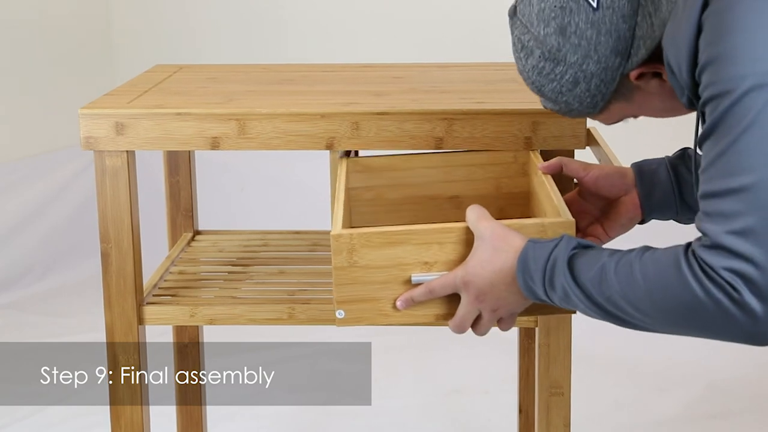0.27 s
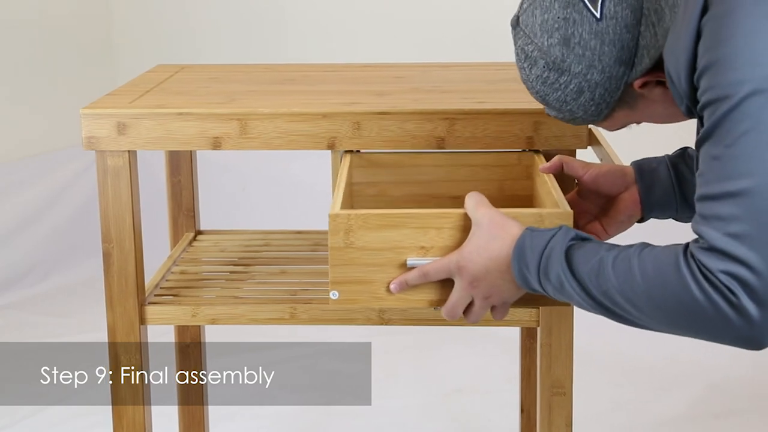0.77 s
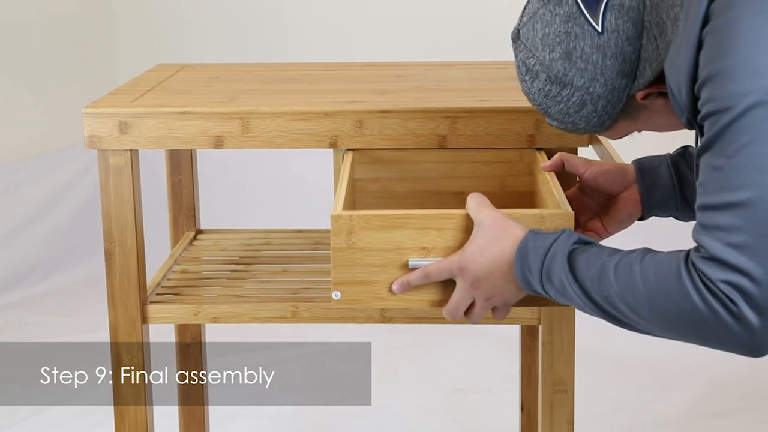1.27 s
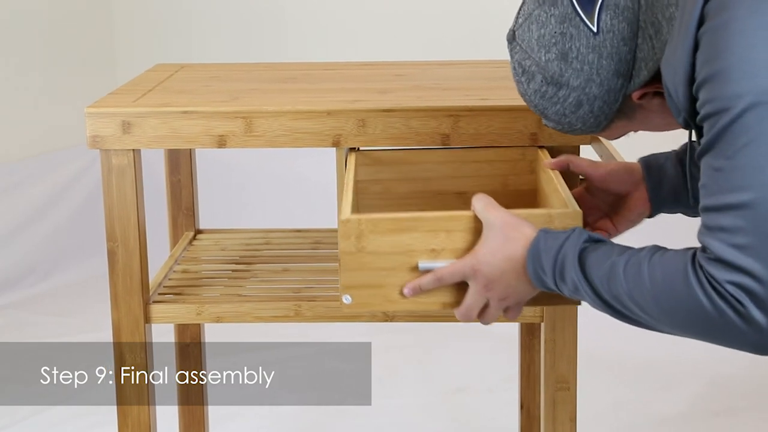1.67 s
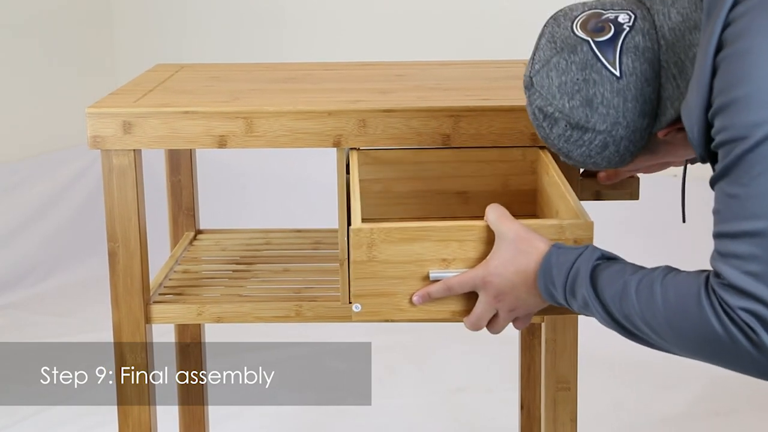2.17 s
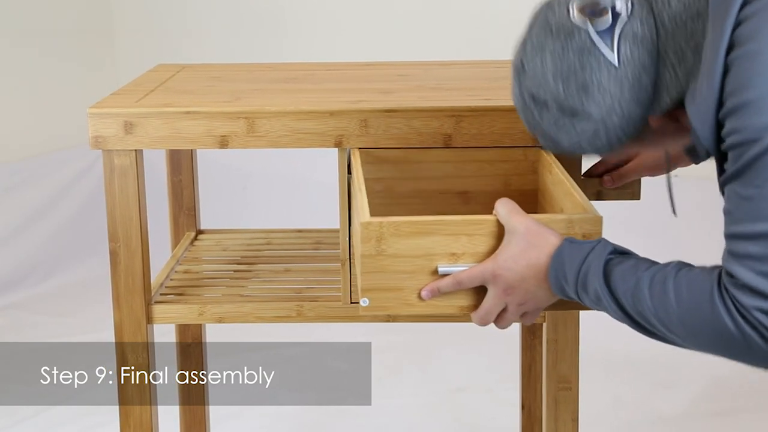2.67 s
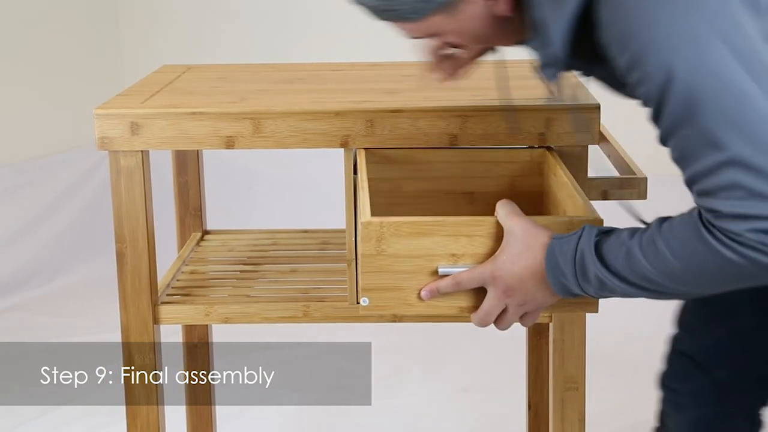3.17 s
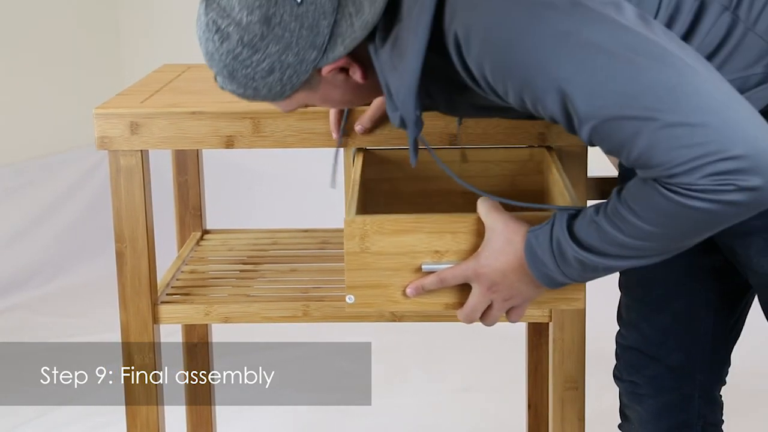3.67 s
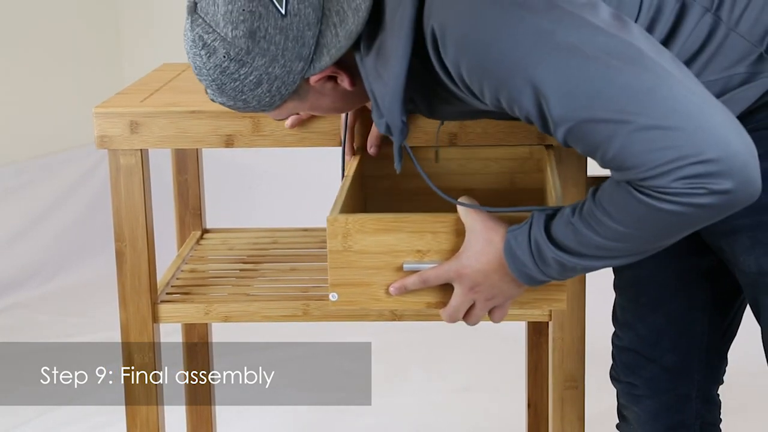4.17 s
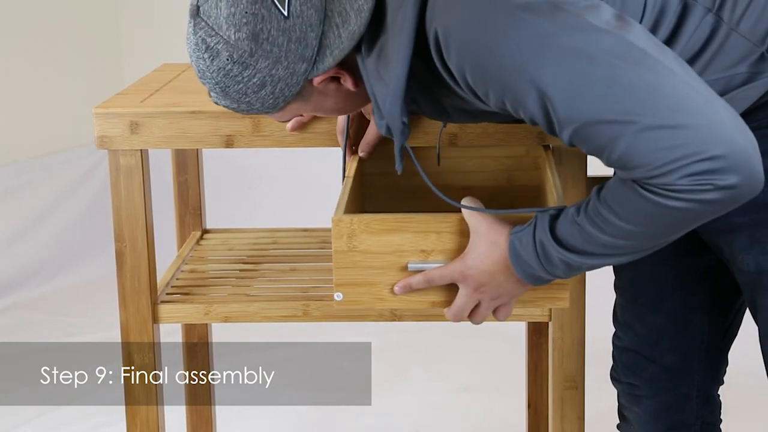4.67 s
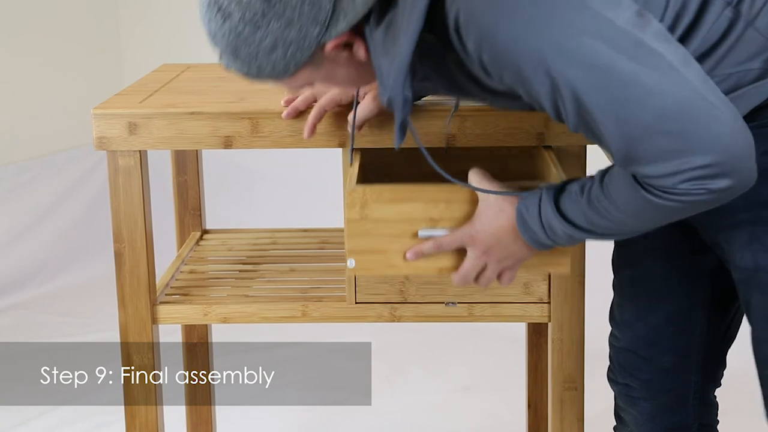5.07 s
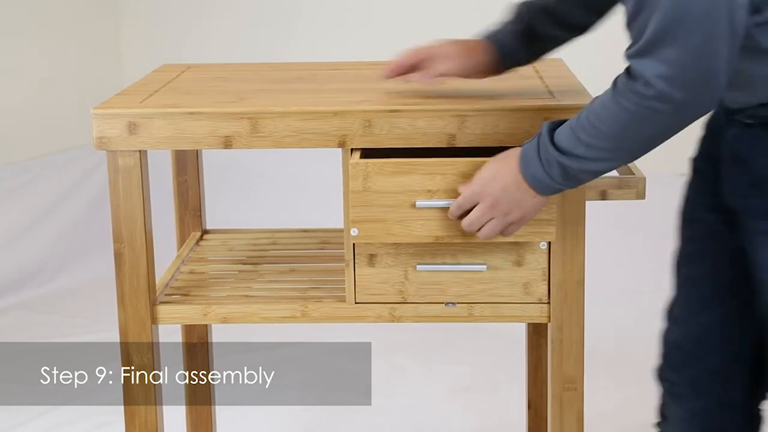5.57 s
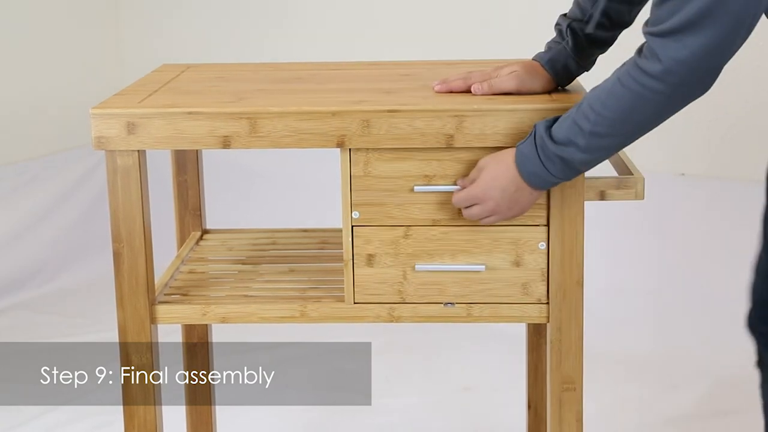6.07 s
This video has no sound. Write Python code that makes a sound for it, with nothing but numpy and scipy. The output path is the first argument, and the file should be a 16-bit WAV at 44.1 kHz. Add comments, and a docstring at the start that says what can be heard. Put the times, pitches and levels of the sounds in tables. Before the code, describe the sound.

In a quiet, bare, lightly echoing room, a hollow wooden drawer is jiggled in a cart, giving uneven knocks, brief scuffs and occasional thin clinks from metal runners. A sleeve brushes faintly midway. After a short lull it scrapes and groans inward in several pushes, then bangs against its stop, overloading the close microphone while the wooden frame hums briefly.

```python
"""A wooden drawer is jiggled into a kitchen cart in a quiet, bare room. From the start it knocks against its
opening (modal blows with scattered reflections); soon its metal runners clink (ticks exciting steel modes).
Between the knocks it scuffs and judders (random slips) and groans as it binds (stick-slip); midway a sleeve
brushes past (filtered noise). At last it slides home in a few pushes and bangs against the stop: the cart's
frame hums on (decaying modes) and the bang overloads the microphone (clipping)."""
import sys
import numpy as np
from scipy import signal
from scipy.fft import rfft, irfft
from scipy.io import wavfile

SR = 44100
rng = np.random.default_rng(int(sys.argv[2]) if len(sys.argv) > 2 else 0)


def wrap_up_sound(samples):
    """Save the sound to the file named by the first command line argument, as 16-bit audio."""
    columns = np.atleast_2d(samples).T
    # keep every value between -1 and 1, then stretch to whole-number steps
    tamed = np.clip(columns, -1, 1)
    steps = np.round(tamed * 32767).astype(np.int16)
    wavfile.write(sys.argv[1], SR, steps)


N = 279594
RING = 32768  # length of one impulse response in samples
AGE, TIME = np.arange(RING) / SR, np.arange(N) / SR  # seconds since a blow, seconds since the start


def amp(db):
    """Level: 20 dB is a factor of ten in amplitude."""
    return 10 ** (np.asarray(db) / 20)


def evened(x):
    """Normalization: scales a signal to rms 1."""
    return x / np.sqrt(np.mean(x ** 2) + 1e-20)


def read(points, hz):
    """Interpolation: reads a table of (Hz, value) on a log-frequency axis."""
    table_hz, value = np.transpose(points)
    return np.interp(np.log(hz + 1), np.log(table_hz + 1), value)


def add(mix, s, sound):
    """Superposition: mixes a sound in at time s, in place."""
    part = mix[round(s * SR):][:len(sound)]
    part += sound[:len(part)]


def coloured(x, points, size=4096):
    """Minimum-phase filtering: a causal response with the given (Hz, dB) shape."""
    log_gain = np.log(amp(read(points, abs(np.fft.fftfreq(size, 1 / SR)))))
    response = np.exp(np.conj(signal.hilbert(log_gain)))
    taps = np.fft.ifft(response).real
    return signal.fftconvolve(x, taps[:size // 2])[:len(x)]


def mode(hz, t60):
    """Damped free vibration: a sine that falls by 60 dB in t60 seconds."""
    return amp(-60 * AGE / t60) * np.sin(2 * np.pi * hz * AGE)


def wander(cutoff_hz):
    """Low-pass random process: smooth chance of rms 1."""
    lowpass = signal.butter(2, cutoff_hz, fs=SR, output="sos")
    return evened(signal.sosfilt(lowpass, rng.standard_normal(N)))


def stroke(s, length, db, build_db_per_s, ease_db_per_s, stop_db_per_s):
    """Exponential envelope of one movement: builds up to time s, eases while it lasts, then dies away."""
    age = TIME - s
    build_db = build_db_per_s * np.maximum(-age, 0)
    ease_db = ease_db_per_s * np.clip(age, 0, length)
    stop_db = stop_db_per_s * np.maximum(age - length, 0)
    return amp(db - np.minimum(build_db + ease_db + stop_db, 120))


# Reverberation of the room. Each row: frequency in Hz, t60 in seconds.
REVERBERATION = [(100, 0.55), (250, 0.62), (500, 0.44), (1000, 0.38), (2500, 0.35), (6000, 0.37),
                 (12000, 0.24)]
# Relative strength of the reflections: weakest near 330 Hz, stronger in the deep bass and toward the treble.
# Each row: frequency in Hz, strength in dB.
SCATTER_STRENGTH = [(150, 1.5), (330, -4.5), (700, -2), (1500, 0), (5000, 2.5)]


def room(wet_db, gap=0.0071, build=0.0028):
    """Diffuse-field reverberation: direct sound, then random reflections that die band by band."""
    reflections = rng.choice([-1., 1.], RING) * (rng.random(RING) < 4000 / SR)
    # a diffuse field favours no pitch: level out the peaks and holes of the dying reflections
    dying = amp(-60 * AGE / read(REVERBERATION, 300))
    spectrum = rfft(reflections * dying)
    power = np.convolve(abs(spectrum) ** 2, signal.windows.hann(46), "same")
    levelled = irfft(spectrum / np.sqrt(power)) / dying * (AGE < .5)
    # each frequency band gets its own strength and decay
    hz, t, bands = signal.stft(levelled, SR, nperseg=256)
    decay_db = 60 * t / read(REVERBERATION, hz)[:, None]
    fade = amp(read(SCATTER_STRENGTH, hz)[:, None] - decay_db)
    tail = signal.istft(bands * fade, SR, nperseg=256)[1][:RING]
    tail *= np.clip((AGE - gap) / build, 0, 1)
    direct = signal.unit_impulse(RING)
    return direct + amp(wet_db) * tail / np.linalg.norm(tail)


# Spectrum of the quiet room. Each row: frequency in Hz, relative density in dB per Hz.
HUSH_SPECTRUM = [(15, -44), (25, -48), (49, -5.5), (91, -18.5), (165, -1), (194, -12), (299, -8),
                 (527, -20), (587, -17), (881, -22), (981, -23.5), (2150, -29), (9460, -37), (15800, -41.5)]
HUSH_DB = -53.5  # rms


def hush():
    """Stationary background noise: random pressure with a fixed spectrum."""
    return amp(HUSH_DB) * evened(coloured(rng.standard_normal(N), HUSH_SPECTRUM))


# Spectrum of the brushing cloth. Each row: frequency in Hz, relative density in dB per Hz.
CLOTH_SPECTRUM = [(600, 2), (2000, 11.5), (5000, -3), (8500, -3.5), (12000, -10), (16000, -10)]
SLEEVE_S, SLEEVE_LENGTH_S, SLEEVE_DB = 2.92, 0.48, -57.5
SLEEVE_BUILD_DB_PER_S, SLEEVE_EASE_DB_PER_S, SLEEVE_STOP_DB_PER_S = 52, 1, 28


def sleeve():
    """Fibre friction: countless fibres brush over each other once as the arm moves round."""
    gain = stroke(SLEEVE_S, SLEEVE_LENGTH_S, SLEEVE_DB,
                  SLEEVE_BUILD_DB_PER_S, SLEEVE_EASE_DB_PER_S, SLEEVE_STOP_DB_PER_S)
    return gain * evened(coloured(rng.standard_normal(N), CLOTH_SPECTRUM))


# Modes of the drawer box. Each row: frequency in Hz, relative spectral peak in dB, t60 in seconds.
DRAWER_MODES = [(116.7, -13, 0.34), (176.8, -11, 0.18), (215.5, 0, 0.17), (236.8, -1.5, .16),
                (306, 2, 0.076), (363.3, 0, 0.086), (422, -4, 0.041), (511.4, -7.5, 0.024),
                (651, -8.5, 0.015), (753, -7, 0.015), (913, -8.5, 0.056), (1111, -15.5, 0.048),
                (1412, -14, 0.072), (1547, -13.5, 0.021), (1858, -27, 0.011), (2320, -35, 0.034),
                (2630, -21.5, 0.034)]


def drawer_modes():
    """Modal analysis: decaying modes scaled to their spectral peaks; neighbours swing oppositely."""
    shapes = []
    for k, (hz, db, t60) in enumerate(DRAWER_MODES):
        peak_scale = 2 * np.log(1000) / (t60 * SR)  # a longer ring needs less amplitude for the same peak
        shapes.append((-1) ** k * amp(db) * peak_scale * mode(hz, t60))
    return np.array(shapes)


def grains(per_s, spread_db):
    """Random impulse process: tiny slips of uneven size between two rubbing surfaces."""
    sizes = amp(spread_db * np.minimum(rng.exponential(1, N), 4)) * rng.choice([-1., 1.], N)
    return evened(sizes * (rng.random(N) < per_s / SR))


# Spectrum of the rubbing runners. Each row: frequency in Hz, relative density in dB per Hz.
RUB_SPECTRUM = [(200, -23.5), (450, -2), (700, -3), (1100, -7), (1800, -2.5), (3000, -8.5), (4500, -11.5),
                (7000, -17), (10000, -21.5), (13000, -30.5), (15800, -37)]
# Scuffs and pushes along the runners. Each row: time when the drawer breaks loose in seconds,
# length in seconds, level of the rubbing in dB, level of the box's judder in dB (before JUDDER_DB).
PUSH_EVENTS = [(1.336, 0.018, -61, -36), (1.72, 0.052, -57, -40), (4.496, 0.064, -57, -39.5),
               (4.686, 0.044, -53.5, -42), (4.89, .095, -37, -38.5), (5.175, 0.27, -37, -29),
               (5.562, 0.02, -35.5, -27.5), (5.802, .18, -37, -33.5)]
JUDDER_DB = -2  # common trim of the judder
# the rubbing builds as the hand leans in, eases, then dies
BUILD_DB_PER_S, EASE_DB_PER_S, STOP_DB_PER_S = 197, 9, 165
# the judder starts abruptly and settles once the drawer moves
JUDDER_BUILD_DB_PER_S, JUDDER_EASE_DB_PER_S, JUDDER_STOP_DB_PER_S = 800, 35, 111


def slide(shapes):
    """Sliding friction: fine slips hiss along the runners while coarser ones shake the box."""
    rubbing, shaking = np.zeros(N), np.zeros(N)
    for s, length, rub_db, judder_db in PUSH_EVENTS:
        rubbing += stroke(s, length, rub_db, BUILD_DB_PER_S, EASE_DB_PER_S, STOP_DB_PER_S)
        shaking += stroke(s, length, judder_db,
                          JUDDER_BUILD_DB_PER_S, JUDDER_EASE_DB_PER_S, JUDDER_STOP_DB_PER_S)
    rub = evened(coloured(grains(per_s=4000, spread_db=0.8), RUB_SPECTRUM)) * rubbing
    shaken_box = signal.fftconvolve(grains(per_s=780, spread_db=1.0), shapes.sum(0))[:N]
    judder = amp(JUDDER_DB) * evened(shaken_box) * shaking
    changing_grip = amp(0.5 * wander(cutoff_hz=37))
    echo = room(wet_db=-9)
    return signal.fftconvolve((rub + judder) * changing_grip, echo / np.linalg.norm(echo))[:N]


# The drawer binds and chatters in its opening. Each row: start in seconds, length in seconds,
# initial level in dB, mean slip rate in Hz.
GROAN_EVENTS = [(1.317, 0.049, -32.5, 335), (1.696, 0.094, -39.5, 343.2), (5.176, 0.09, -24.5, 378.5),
                (5.274, 0.07, -26.5, 389.7), (5.582, 0.097, -33.5, 179.3), (5.762, 0.12, -28.5, 334)]
GROAN_FADE_DB_PER_S = 54  # the bind works itself free
GROAN_RISE_S = 0.0064  # fade in and out


def groans(jitter=0.05, flutter_db=3.0, overtone_db=-13):
    """Stick-slip oscillation: wood sticks and slips at an unsteady rate, with weaker overtones."""
    out = np.zeros(N)
    unsteady = 1 + jitter * wander(cutoff_hz=90)
    grip = amp(flutter_db * wander(cutoff_hz=74))
    for s, length, db, hz in GROAN_EVENTS:
        age = np.maximum(TIME - s, 0)
        phase = 2 * np.pi * np.cumsum(hz * unsteady) / SR
        overtones = np.sin(2 * phase) + .5 * np.sin(3 * phase)
        slips = np.sin(phase) + amp(overtone_db) * overtones
        fade = amp(db - GROAN_FADE_DB_PER_S * np.minimum(age, length))
        onset = np.clip(age / GROAN_RISE_S, 0, 1)
        release = np.clip((length - age) / GROAN_RISE_S + 1, 0, 1)
        out += fade * slips * grip * onset * release
    return signal.fftconvolve(out, room(wet_db=-3))[:N]


# Modes of a metal runner. Each row: frequency in Hz, relative level in dB, t60 in seconds.
RUNNER_MODES = [(2150, -8, .18), (2430, -5, 0.17), (3891, 7, 0.14), (3934, 15.5, 0.086), (4230, -1, .2),
                (5370, -14, 0.15), (6020, -12, 0.14), (6900, -7, 0.14), (7520, -5, .14), (8950, -6, 0.13),
                (10300, 7, .13), (13200, -5, 0.095)]
# The contact is too slow for the highest treble. Each row: frequency in Hz, gain in dB.
CONTACT_TREBLE = [(9000, -1), (11500, -4.5), (15000, -10)]
# Metal runners touching. Each row: start in seconds, rms level of the first 20 ms in dB (before the
# treble loss), pitch of the contact in Hz, share of ring from 0 to 1, level of the reflections in dB.
CLINK_EVENTS = [(.868, -46, 10000, .1, -3), (1.633, -54, 1770, 0, -2), (3.069, -39.5, 3550, 0.05, 6),
                (3.357, -55, 3700, .1, -5), (3.818, -38.5, 6500, 0.26, 4.5), (4.953, -46, 5000, 0.2, -5),
                (5.502, -49, 9000, 0, -12), (5.554, -33, 3850, 0.08, -1), (5.976, -28, 4800, 0.12, 2.5)]


def clinks(ring_db=-22, tick_t60=0.014, bass_db=-40, treble_db=-19):
    """Impact excitation: a sharp tick of steel, and the runner rings as far as the hand leaves it free."""
    out = np.zeros(N)
    steel = sum(amp(db) * mode(hz, t60) for hz, db, t60 in RUNNER_MODES)
    for s, db, hz, ring, wet_db in CLINK_EVENTS:
        tick = rng.standard_normal(RING) * amp(-60 * AGE / tick_t60)
        contact = [(hz / 10, bass_db), (hz / 2, -5), (hz, 0),
                   (hz * 2, -9), (hz * 3, treble_db), (hz * 10, 2 * treble_db)]
        clink = coloured(tick + ring * amp(ring_db) * steel, contact)
        heard = signal.fftconvolve(clink, room(wet_db, gap=0.0022))[:RING]
        add(out, s, amp(db) * heard / np.std(heard[:882]))
    return coloured(out, CONTACT_TREBLE)


def bottom(level_db, hz, delay, width):
    """Plate vibration: the thin bottom board heaves a few times just after the contact."""
    swell = np.exp(-((AGE - delay) / width) ** 2)
    return amp(level_db) * swell * np.sin(2 * np.pi * hz * AGE)


# The drawer's crowd of short upper modes. Each row: frequency in Hz, gain in dB.
CRACK_SPECTRUM = [(30, -45), (90, -29), (300, -15), (1000, -11.5), (1800, -12.5), (3000, -20.5),
                  (5000, -28.5), (8000, -38.5), (15000, -48.5)]
PANEL_HZ = 694  # the side panel that takes the blows


def box(shapes, crack_t60=0.047, place_db=1, rise=0.0017):
    """Modal superposition: the place of contact decides how strongly each mode of the box speaks."""
    weights = amp(place_db * rng.standard_normal(len(shapes)))
    burst = rng.standard_normal(RING) * amp(-60 * AGE / crack_t60)
    crack = coloured(burst / np.linalg.norm(burst), CRACK_SPECTRUM)
    panel = amp(-44) * mode(PANEL_HZ, t60=0.035)
    # bending waves need a moment to spread through the boards
    spreading = 1 - np.exp(-AGE / rise)
    heave = bottom(level_db=-46.5, hz=333.7, delay=0.0077, width=0.0041)
    return (weights @ shapes + crack + panel) * spreading + heave


# Body, panel, clack and click of an ordinary blow.
# Each row: lower edge in Hz, upper edge in Hz, usual level in dB.
BLOW_REGISTERS = [(168, 560, -1.5), (533, 870, -5.5), (1127, 1540, -10), (2850, 8800, -24.5)]


def voiced(sound, levels_db, sub_db=-9, top_db=-6, size=1764):
    """Spectral balance: sets each register over the 40 ms attack; small boards radiate little deep bass."""
    power = abs(rfft(sound[:size], 2 * size)) ** 2 / size ** 2
    hz = np.fft.rfftfreq(2 * size, 1 / SR)
    shape = []
    for (low, high, usual_db), db in zip(BLOW_REGISTERS, levels_db):
        present_db = 10 * np.log10(power[(hz > low) & (hz < high)].sum() + 1e-20)
        shape.append((np.sqrt(low * high), db + usual_db - present_db))
    body_db, click_db = shape[0][1], shape[-1][1]
    return coloured(sound, [(70, body_db + sub_db), (130, body_db), *shape, (15000, click_db + top_db)])


# The drawer knocks against its opening. Each row: start in seconds, level of the hollow body in dB,
# hardness of the contact in dB, emphasis of the side panel in dB.
KNOCK_EVENTS = [(0.073, -26.5, -14.5, -6.5), (0.183, -39, -11.5, -9.5), (0.623, -31, -10, -1.5),
                (0.854, -23.5, 0, -6.5), (0.86, -15.5, -5.5, -3), (1.101, -45.5, -8.5, -1.5),
                (1.331, -32, -13, -4), (1.379, -27, -2, 2.5), (1.76, -36.5, -6, -9.5),
                (2.172, -33, -4, 3.5), (2.311, -37, -3.5, 7), (2.409, -26, -4, 0.5),
                (2.663, -32.5, -7, 2.5), (2.714, -23, -13, -2), (2.762, -37, -17, 6),
                (2.86, -42.5, -6, 6.5), (2.96, -25, -8, 3.5), (3.077, -34, -10.5, -9),
                (3.249, -34, -11.5, -4.5), (3.604, -26.5, -18, -11.5), (3.735, -23, -1, 0.5),
                (3.814, -31.5, -10, -10), (3.862, -26.5, -20, -14), (3.962, -35.5, -13.5, -7.5),
                (4.494, -32, -18, -3), (4.799, -32, -13, -10), (4.954, -35, 4.5, -4), (5.28, -32.5, -4, 0),
                (5.421, -33.5, -7, 3.5), (5.554, -36, 0, 7), (5.9573, -17.5, -2.5, -2),
                (5.9624, -13.5, 2, 4.5), (5.98, -14, 0.5, -10)]
CLICK_SHARE, CLICK_DB = 1.03, 0.5  # the click follows hardness a little more steeply than the clack
# each knock rebounds once, weaker and softer, after a flight that varies by the spread as a fraction
BOUNCE_S, BOUNCE_SPREAD, BOUNCE_DB, BOUNCE_HARDNESS_DB = .026, .25, -11, -4.5


def knocks(shapes):
    """Contact stiffness: soft bumps stir mainly the hollow body; hard corners add clack and click."""
    out = np.zeros(N)
    for s, db, hardness_db, panel_db in KNOCK_EVENTS:
        flight = BOUNCE_S * (1 + BOUNCE_SPREAD * rng.uniform(-1, 1))
        first = (0, db, hardness_db)
        rebound = (flight, db + BOUNCE_DB, hardness_db + BOUNCE_HARDNESS_DB)
        for delay, level_db, hard_db in [first, rebound]:
            # every contact has its own place in the room
            heard = signal.fftconvolve(box(shapes), room(wet_db=3.5, gap=0.0053, build=0.0017))[:RING]
            offsets_db = np.array([0, panel_db, hard_db, CLICK_SHARE * hard_db + CLICK_DB])
            add(out, s + delay, voiced(heard, level_db + offsets_db))
    return out


# Modes of the cart's frame, struck when the drawer meets its stop.
# Each row: frequency in Hz, level in dB (before CART_DB), t60 in seconds.
CART_MODES = [(56.7, -49, .4), (117.2, -41, 0.69), (179.6, -15, 0.55), (212.4, -14.5, 0.57),
              (325.2, -1.5, 0.29), (515, -13.5, 0.36), (537, -11, 0.27), (669, -10, 0.2), (744, -11, 0.14),
              (940, -20, 0.38)]
STOP_S, CART_DB, CART_RISE_S = 5.9635, 2.5, 0.0073


def cart():
    """Momentum transfer: the frame takes up the drawer's momentum and hums on in its modes."""
    out = np.zeros(N)
    ring = sum(amp(db) * mode(hz, t60) for hz, db, t60 in CART_MODES)
    add(out, STOP_S, amp(CART_DB) * ring * (1 - np.exp(-AGE / CART_RISE_S)))
    return out


def scene():
    """Linear superposition: all the sources over the quiet of the room."""
    shapes = drawer_modes()
    background = hush() + sleeve()
    friction = slide(shapes) + groans()
    blows = clinks() + knocks(shapes) + cart()
    return (background + friction + blows)[None]


EDGE_HZ = 15900  # upper band limit


def record(dry):
    """Overload and band limiting: peaks clip at full scale, then a low-pass removes the highest treble."""
    clipped = np.clip(dry, -1, 1)
    lowpass = signal.firwin(1023, EDGE_HZ, window=("kaiser", 9), fs=SR)
    return signal.oaconvolve(clipped, lowpass[None], "same")


dry = scene()
out = record(dry)
wrap_up_sound(out)
```